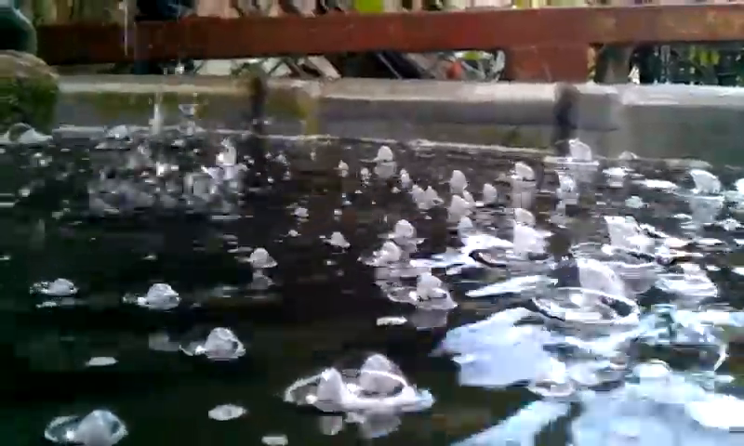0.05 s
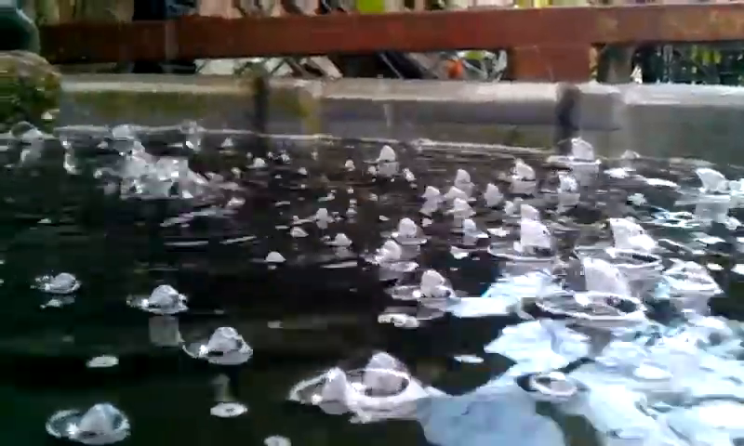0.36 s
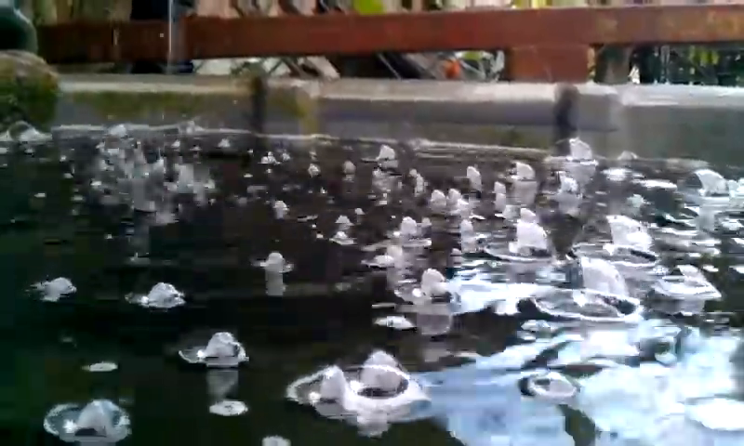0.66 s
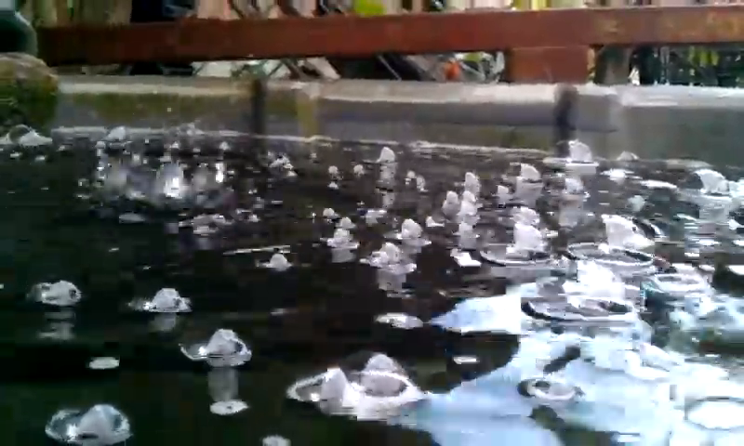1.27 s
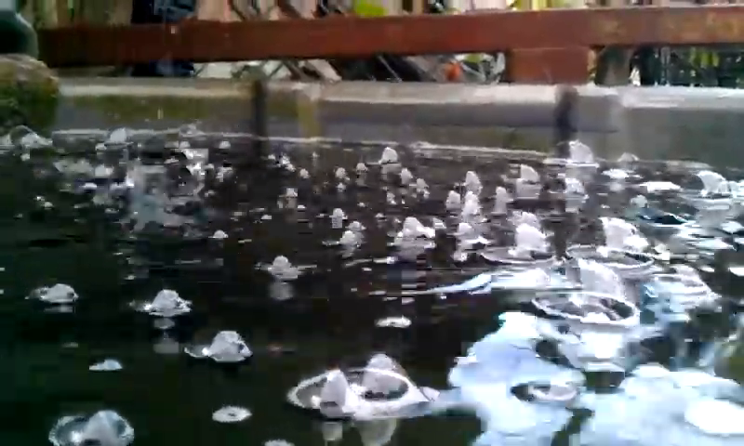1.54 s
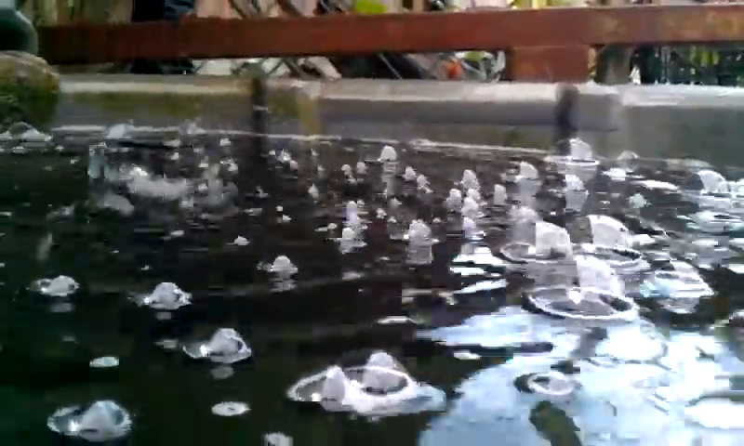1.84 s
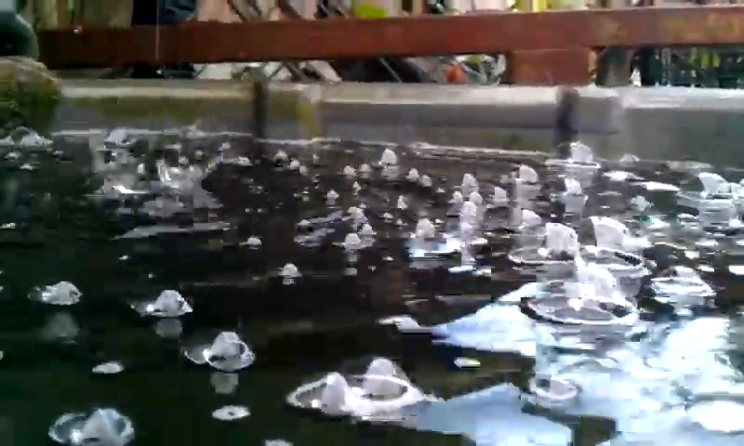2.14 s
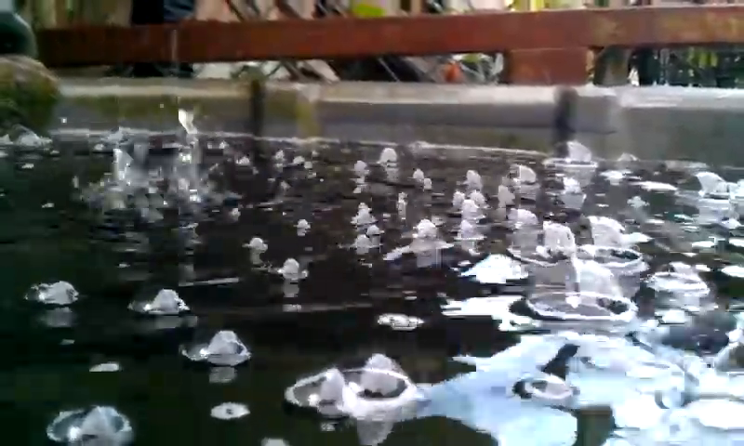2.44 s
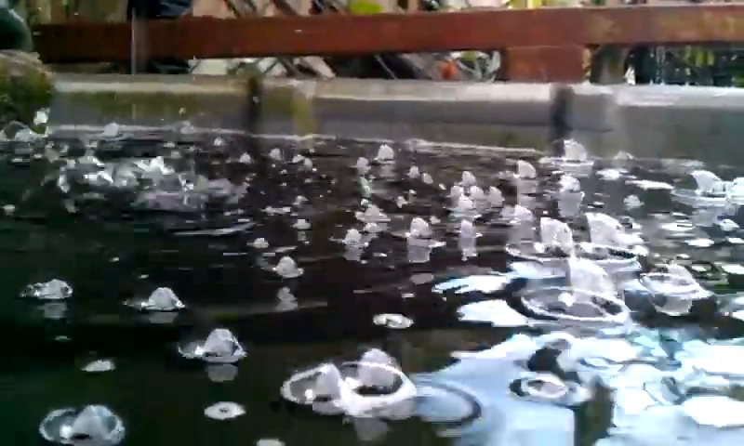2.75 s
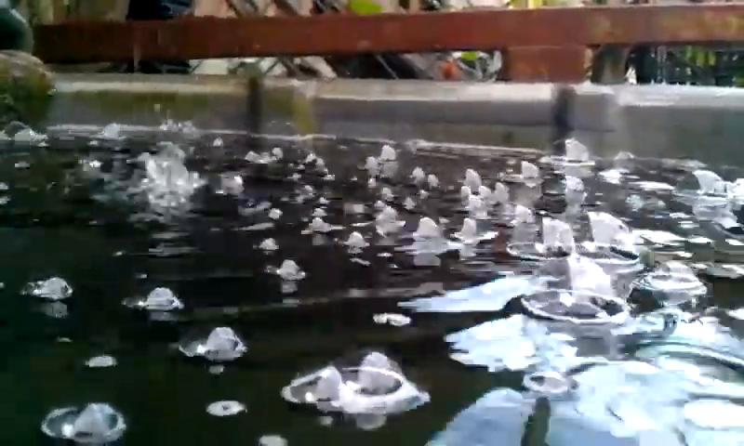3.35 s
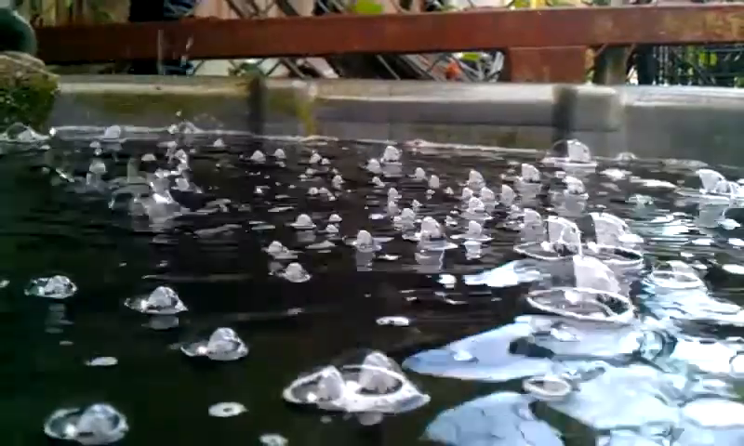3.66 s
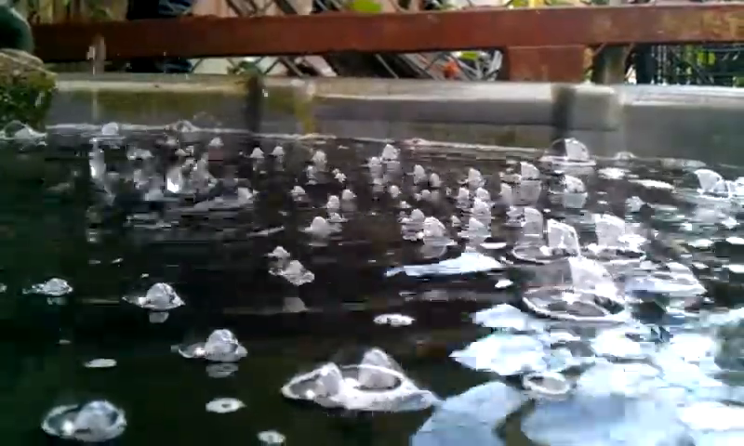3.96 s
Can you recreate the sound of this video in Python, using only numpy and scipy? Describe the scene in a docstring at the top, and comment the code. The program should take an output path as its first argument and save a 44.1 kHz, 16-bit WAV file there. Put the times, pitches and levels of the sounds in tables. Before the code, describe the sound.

Water trickles and drips into a full outdoor tank, close by, for the whole four seconds. Drops strike quickly and unevenly with short, bright splashing ticks, slightly sharper around 1.6, 2.2, 2.6 and 3.9 seconds. Between them, small bubbles plop and plink, some steady in pitch and others rising. Fine spray patters on the surface from start to end, over a very faint, steady outdoor rumble.

```python
"""A thin, broken stream of water falls into a full outdoor tank, close by, for four seconds. First each drop
cracks and slaps on the surface, and with each hit sounds a short, bright ringing tick; a moment later come its
froth and a brief echo off the tank's rim. Between drops, bubbles plop and plink: some hold a nearly steady
pitch, others rise in pitch as they float up. From start to end, thrown-up spray patters back over a faint
outdoor rumble."""
import sys
import numpy as np
from scipy import signal
from scipy.fft import rfft, irfft, next_fast_len
from scipy.io import wavfile
from scipy.ndimage import map_coordinates

SR = 44100
rng = np.random.default_rng(int(sys.argv[2]) if len(sys.argv) > 2 else 0)


def master(y):
    """Save y as 16-bit WAV."""
    cut = np.clip(np.atleast_2d(y).T, -1, 1)
    pcm = np.round(cut * 32767)  # scale
    wavfile.write(sys.argv[1], SR, pcm.astype(np.int16))


N = 176400

# Falling drops. Each row: start in seconds, relative levels of the bright tick and the slap in dB.
FALLING_DROPS = [(0.0836,-12.5,-59),(0.1022,-13,-27.5),(0.197,-15.5,-32),(0.2656,-10,-48),(.2871,-18,-51),(.327,-20,-31),
                 (0.423,-10,-35),(0.5029,-12,-29.5),(0.543,-6.5,-63),(.5855,-23,-28.5),(0.6213,-14,-41),(0.7144,-9,-28),
                 (.8897,-18,-30.5),(0.9221,-19.5,-29),(0.9826,-7,-29.5),(1.0326,-10.5,-28),(1.0668,-10,-31),(1.1086,-10,-29),
                 (1.1758,-14,-36),(1.2417,-14,-27.5),(1.268,-11,-28),(1.287,-10,-40),(1.4089,-12,-28.5),(1.4816,-13,-37),
                 (1.518,-11,-28),(1.6143,-27,-23),(1.6386,-5,-25),(1.7271,-13,-34),(1.8685,-13.5,-17),(1.906,-21,-30),
                 (1.9508,-16,-32),(2.0362,-17,-24),(2.0522,-13,-30),(2.2071,-5,-33),(2.3539,-13,-30),
                 (2.4,-15.5,-33.5),(2.4284,-12.5,-41),(2.4492,-21,-31.5),(2.5014,-34,-18.5),(2.556,-23,-32.5),
                 (2.6211,-2.5,-26.5),(2.6451,-20,-43),(2.679,-11.5,-43),(2.6888,-10,-26),(2.7451,-20,-28.5),(2.7716,-18,-27),
                 (2.8326,-10,-42),(2.9502,-11.5,-36),(3.0559,-6.5,-33),(3.0958,-8,-58),(3.1182,-9.5,-40),(3.1435,-30,-25),
                 (3.1899,-14,-27),(3.2156,-12,-27.5),(3.2683,-12,-32.5),(3.3138,-24,-28),(3.359,-13,-28.5),
                 (3.4223,-21.5,-27),(3.4853,-6.5,-28),(3.5224,-14,-29.5),(3.5575,-8.5,-50),(3.575,-12,-40),(3.6513,-6,-26),
                 (3.6767,-12,-31),(3.7652,-18,-38),(3.8928,-5.5,-32.5),(3.9209,-2,-27),(3.9772,-13,-56)]
# Floating bubbles. Each row: start and life in seconds, base pitch in Hz, relative level in dB.
FLOATING_BUBBLES = [(.141,0.011,803,-28.5),(.38,0.057,447,-35.5),(.392,0.082,609,-27),(0.426,0.022,2187,-29.5),(.462,0.013,1300,-25.5),
                    (0.503,0.0091,2420,-22.5),(.596,0.038,633,-36.5),(0.966,0.039,1160,-44.5),(1.217,0.024,695,-31.5),(1.409,0.0079,1000,-23),
                    (1.463,0.062,820,-40.5),(1.63,.021,964,-29),(1.648,0.039,559,-39),(2.007,0.024,1304,-27),(2.036,0.017,1405,-23.5),
                    (2.049,0.048,707,-35.5),(2.315,0.0053,1430,-28),(2.329,0.046,575,-37.5),(2.434,0.069,636,-39),
                    (2.495,.005,1790,-26),(2.57,0.034,683,-28),(2.798,0.032,580,-30.5),(2.82,0.0069,2280,-23.5),(2.85,0.0099,1267,-30),
                    (2.916,0.019,1197,-38),(3.058,0.019,978,-29.5),(3.224,.022,1097,-38.5),(3.527,0.047,855,-29),(3.578,0.029,692,-33.5),
                    (3.845,0.061,818,-35.5),(3.937,0.0386,583,-35)]
# Low plops and small high plinks of nearly steady pitch that fade quickly.
# Each row: start in seconds, base pitch in Hz, relative level in dB.
STEADY_BUBBLES = [(.102,961,-24.5),(.488,1137,-31),(.761,3040,-31),(.822,1420,-40),(.853,4450,-20.5),(.924,1277,-28.5),(1.02,2505,-34),
                  (1.328,1730,-24),(1.412,2390,-24.5),(1.469,2630,-29.5),(1.543,706,-27),(2.14,1427,-31.5),(2.241,774,-37),
                  (2.466,2340,-28),(2.468,3340,-22.5),(2.502,3760,-16.5),(2.742,1228,-30),(2.981,627,-24.5),
                  (3.057,1884,-22.5),(3.517,2760,-23)]
# Spray pitches in Hz. A droplet is equally likely to fall between any two neighbours.
SPRAY_PITCHES = [2384, 3780, 5420, 8120, 9900]
# The tone of five noises. Each row: frequency in Hz, relative level in dB.
SLAP_TONE = [(300, -32.5), (1500, -10.5), (3800, 2), (8000, 4), (11000, -7), (16000, -29.5)]  # a drop hitting the water
CRACK_TONE = [(800, -31.5), (5500, -5), (7800, 9.5), (9500, 4.5), (11500, -16.5), (16000, -20.5)]  # the bright edge of that hit
SNAP_TONE = [(200, -30), (1500, 4.5), (3000, -5.5), (10000, -15)]  # a bubble snapping shut
PATTER_TONE = [(500, -25.5), (2800, -12), (4000, -8.5), (6000, -3), (7800, 5), (11400, -14), (16000, -23.5)]  # spray landing
RUMBLE_TONE = [(20, -30), (60, 0.5), (120, 8.5), (220, 5.5), (800, 0), (5000, -14.5)]  # the outdoors

# _S means seconds; _T60 means the seconds a sound takes to fade by 60 dB.
TICK_HZ, TICK_T60, TICK_RISE_PER_S, TICK_ATTACK_S = 7825, 0.0059, 8.1, 0.00048
CRACK_T60, SLAP_T60, SNAP_T60 = 0.0072, 0.011, 0.021
FROTH_HZ, FROTH_OCTAVES, FROTH_DELAY_S = 4480, 0.28, 0.0037
STEADY_CYCLES, STEADY_PITCH_RATIO, STEADY_FADE_DB = 68.4, 1.15, 28.5
SURFACE_HZ, SURFACE_PULL, FLOAT_FADE_DB = 3980, 0.37, 11.5  # floating bubbles climb partway to this pitch
PLOP_ATTACK_S, PLOP_SETTLE_S, PLOP_RELEASE_S = 0.00028, 0.0018, 0.0041
CHIRPS_PER_S, CHIRP_CYCLES, CHIRP_RISE, CHIRP_DB = 480, 28, 0.4, -43.5
SPLATS_PER_S, SPLAT_S, PATTER_DB = 420, 0.0013, -37
SURGE_DB, CLUMP_DB, CLUMP_S = 6, 1, 0.0071
RIM_DELAY_S, RIM_GAIN, TAIL_T60, TAIL_DB = 0.0022, 0.63, 0.089, -5
RUMBLE_DB, TOP_HZ = -62.5, 16200


def drops():
    """Each drop cracks, slaps the surface and stirs up bubbly froth; a bright ringing tick sounds with each
    hit."""
    out, t = np.zeros(N), clock(2600)
    for start, tick_db, slap_db in FALLING_DROPS:
        tick_hz = TICK_HZ * np.exp(0.043 * rng.standard_normal())
        tick = ringing_tone(t, tick_hz, TICK_T60, TICK_RISE_PER_S) * (1 - np.exp(-t / TICK_ATTACK_S))
        crack = amp(tick_db - 10.5) * puff(t, CRACK_T60, CRACK_TONE)
        slap = amp(slap_db + 5) * puff(t, SLAP_T60, SLAP_TONE)
        drop = amp(tick_db + 3) * tick + crack + slap
        for delay, pitch in rng.standard_normal(size=(4, 2)):
            hz = FROTH_HZ * 2 ** (FROTH_OCTAVES * np.clip(pitch, -2, 2))
            froth = amp(slap_db + 4) * ringing_tone(t, hz, TICK_T60, 2 * TICK_RISE_PER_S)
            add(drop, FROTH_DELAY_S * abs(delay), froth)
        add(out, start, tank_echo(drop))
    return out


def bubbles():
    """A bubble snaps shut, rings and fades, at a nearly steady pitch or rising as it floats up."""
    out, t = np.zeros(N), clock(5500)
    steady = [(start, STEADY_CYCLES / hz, hz, hz * STEADY_PITCH_RATIO, db, STEADY_FADE_DB)
              for start, hz, db in STEADY_BUBBLES]
    floating = [(start, life, hz, hz * (SURFACE_HZ / hz) ** SURFACE_PULL, db, FLOAT_FADE_DB)
                for start, life, hz, db in FLOATING_BUBBLES]
    for start, life, low_hz, high_hz, db, fade_db in steady + floating:
        age = np.minimum(t / life, 1.1)
        hz = low_hz * (high_hz / low_hz) ** (age ** 2.4)  # the pitch climbs late
        hz *= 1 + 0.21 * np.exp(-t / PLOP_SETTLE_S)  # a new bubble starts high and settles
        level = amp(-fade_db * age) * (1 - np.exp(-t / PLOP_ATTACK_S))
        level *= np.exp(-np.maximum(t - life, 0) / PLOP_RELEASE_S)
        swell, sway = (0.8 * age * wobble(t, per_s=166) for _ in range(2))  # the gurgle grows with age
        ring = level * np.exp(swell) * np.sin(2 * np.pi * np.cumsum(hz) / SR + 2 * sway)
        snap = amp(-4) * puff(t, SNAP_T60, SNAP_TONE)
        add(out, start, tank_echo(amp(db - 2) * (ring + snap), echo_db=-6))
    return out


def spray():
    """Droplets fall back in clumps, making quick bubble chirps and little splats."""
    flow = stream_strength()
    chirps, splats, t = np.zeros(N), np.zeros(N), clock(1000)
    for when, pitch, softness, life, rise in rng.random((int(CHIRPS_PER_S * N / SR), 5)):
        hz = np.interp(pitch, np.linspace(0, 1, len(SPRAY_PITCHES)), SPRAY_PITCHES)
        t60 = CHIRP_CYCLES * (0.5 + life) / hz
        gain = amp(-6.5 * np.log(softness + 0.1)) * (hz / TICK_HZ) ** 0.5  # many quiet, a few loud
        add(chirps, when * N / SR, gain * ringing_tone(t, hz, t60, CHIRP_RISE * rise / t60))
    for when, softness in rng.random((int(SPLATS_PER_S * N / SR), 2)):
        gain = amp(-10 * np.log(softness + 0.1))
        add(splats, when * N / SR, gain * np.exp(-t / SPLAT_S))
    patter = shape_tone(splats * rng.standard_normal(N), PATTER_TONE)
    return amp(CHIRP_DB) * scatter(flow * chirps) + amp(PATTER_DB) * scatter(flow * patter)


def stream_strength():
    """The trickle surges at random and thickens around each drop."""
    t = clock(N)
    near_drop = sum(np.exp(-((t - start) / CLUMP_S) ** 2) for start, _, _ in FALLING_DROPS)
    surge = np.tanh(wobble(t, per_s=45))
    return unit_level(amp(SURGE_DB * surge + CLUMP_DB * np.minimum(near_drop, 1)))


def scatter(sound, size=2205):
    """Every short stretch of spray lands on its own spot, so it gets its own echo."""
    out = np.zeros(N)
    for i in range(0, N, size):
        add(out, i / SR, tank_echo(sound[i:i + size]))
    return unit_level(out)


def tank_echo(sound, echo_db=0, size=5000):
    """The rim adds three echoes and a short tail, different for every spot on the water."""
    t = clock(size)
    tail = rng.standard_normal(size) * fade(t, TAIL_T60) * (1 - fade(t, RIM_DELAY_S * 2))
    echoes = amp(TAIL_DB) * unit_level(tail) / np.sqrt(size)
    for bounce in range(1, 4):
        delay = (bounce + rng.uniform(-0.46, 0.5)) * RIM_DELAY_S
        add(echoes, delay, np.array([RIM_GAIN ** bounce]))
    echoes *= amp(echo_db)
    echoes[0] += 1  # the direct sound
    return signal.fftconvolve(sound, echoes)


def outdoor_rumble():
    """The faint, steady rumble of the outdoors."""
    return amp(RUMBLE_DB) * unit_level(shape_tone(rng.standard_normal(N), RUMBLE_TONE, size=8192))


def ringing_tone(t, hz, t60, rise_per_s):
    """A short tone that dies away while its pitch rises."""
    tone = np.sin(2 * np.pi * hz * (t + rise_per_s * t * t / 2))
    return tone * fade(t, t60) * (1 - np.exp(-hz * t))


def puff(t, t60, tone):
    """A short puff of noise with the given tone."""
    return shape_tone(rng.standard_normal(len(t)) * fade(t, t60), tone)


def shape_tone(sound, tone, size=1024):
    """Make some frequencies louder and others quieter, following a tone table."""
    hz, db = np.transpose(tone)
    gain = amp(np.interp(np.log(np.fft.rfftfreq(size, 1 / SR) + 1), np.log(hz), db))
    cepstrum = irfft(np.log(gain))
    cepstrum[1:size // 2] *= 2  # fold it so that the filter never rings before a hit
    cepstrum[size // 2 + 1:] = 0
    response = irfft(np.exp(rfft(cepstrum)))
    return signal.fftconvolve(sound, response / np.linalg.norm(response))[:len(sound)]


def wobble(t, per_s):
    """A smooth curve through per_s random points a second."""
    return map_coordinates(rng.standard_normal(size=400), [t * per_s], mode="wrap")


def add(out, start, sound):
    """Mix a sound into out, from start in seconds."""
    i = max(0, round(start * SR))
    out[i:i + len(sound)] += sound[:max(0, len(out) - i)]


def fade(t, t60):
    return np.exp(-np.log(1000) * t / t60)


def amp(db):
    return 10 ** (np.asarray(db) / 20)


def unit_level(sound):
    return sound / np.sqrt(np.mean(sound ** 2) + 1e-20)


def clock(size):
    return np.arange(size) / SR


def scene():
    """All four layers play together in one channel."""
    return (drops() + bubbles() + spray() + outdoor_rumble())[None]


def record(dry):
    """Cut away everything above TOP_HZ."""
    size = next_fast_len(N + 8192)
    audible = np.fft.rfftfreq(size, 1 / SR) < TOP_HZ
    return irfft(rfft(dry, size) * audible, size)[..., :N]


dry = scene()
out = record(dry)
master(out)
```